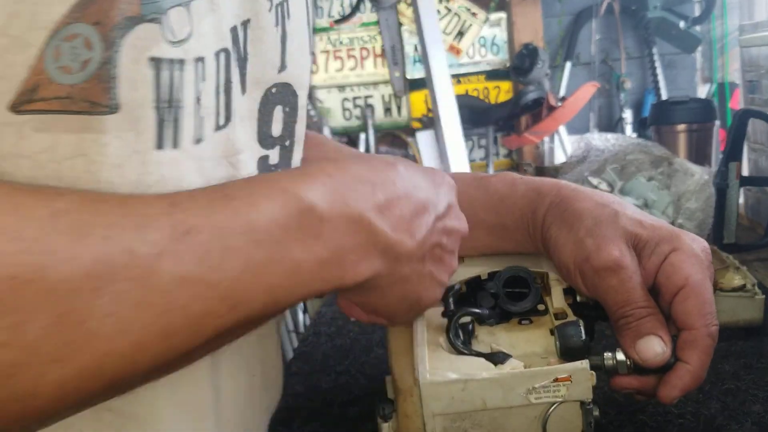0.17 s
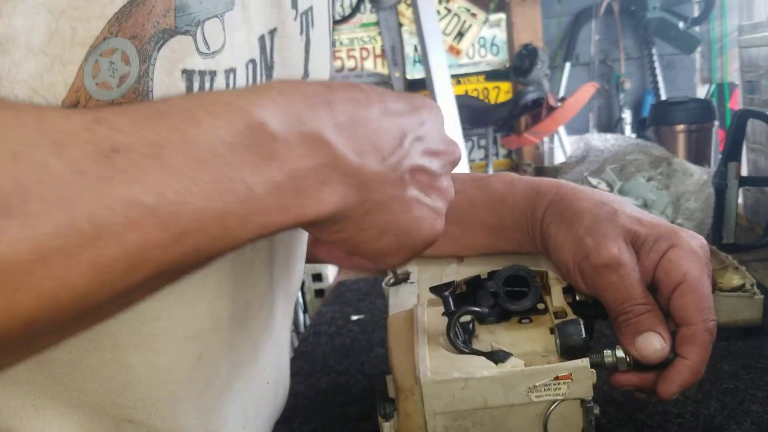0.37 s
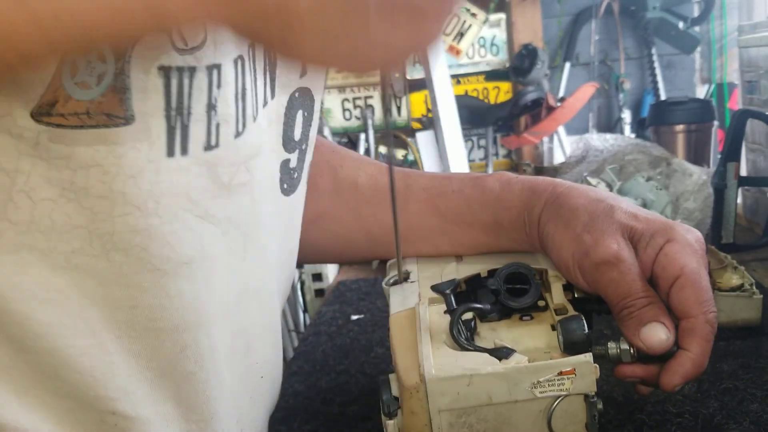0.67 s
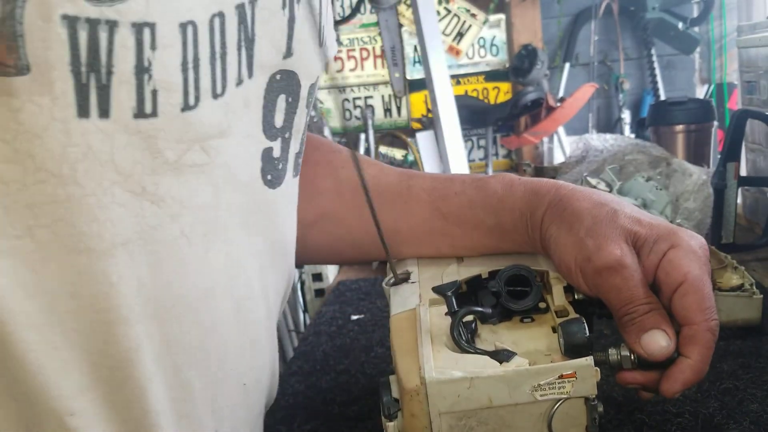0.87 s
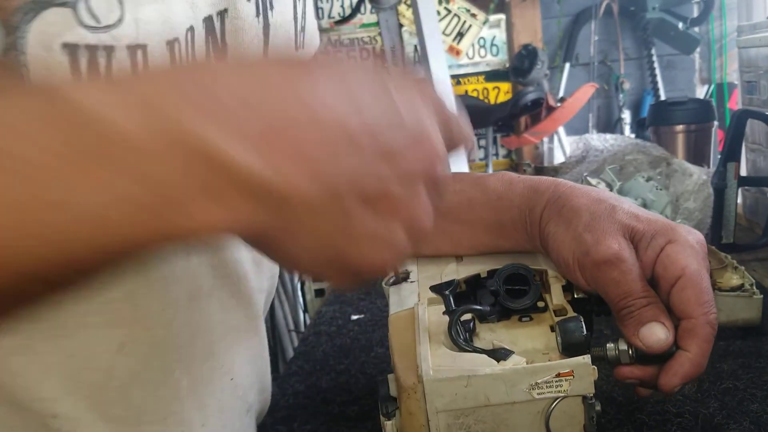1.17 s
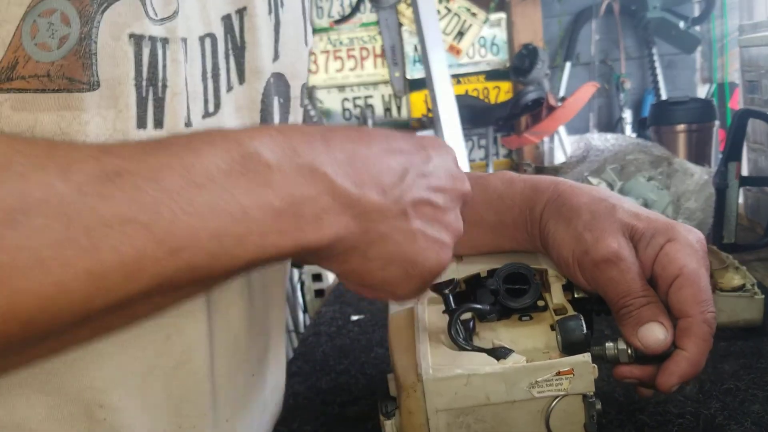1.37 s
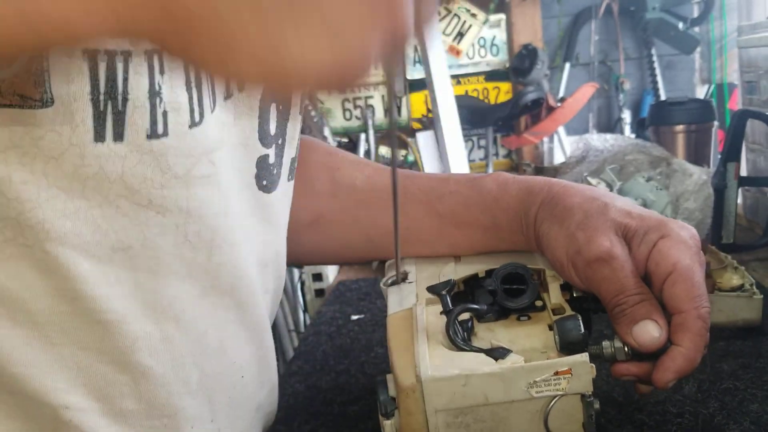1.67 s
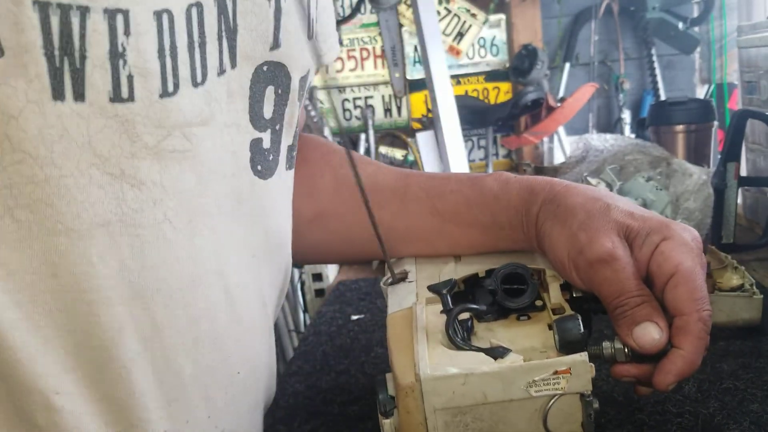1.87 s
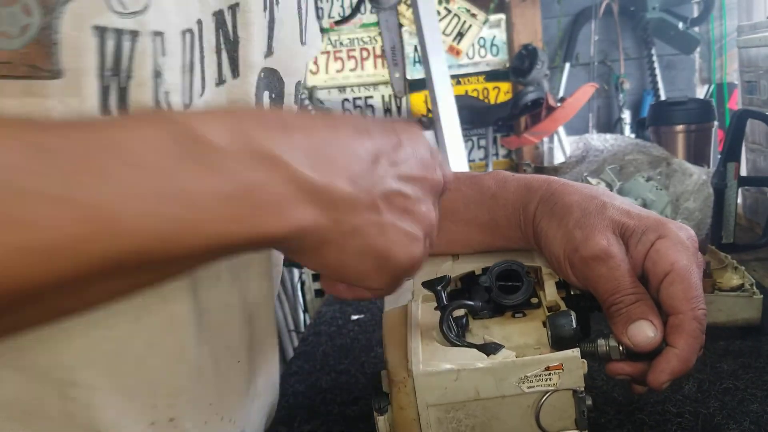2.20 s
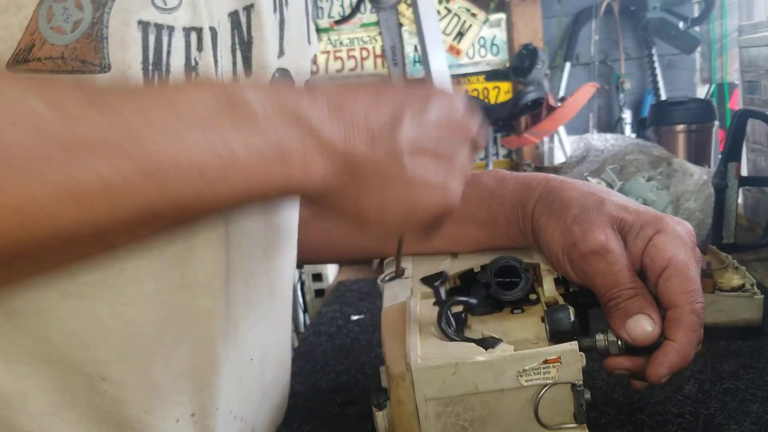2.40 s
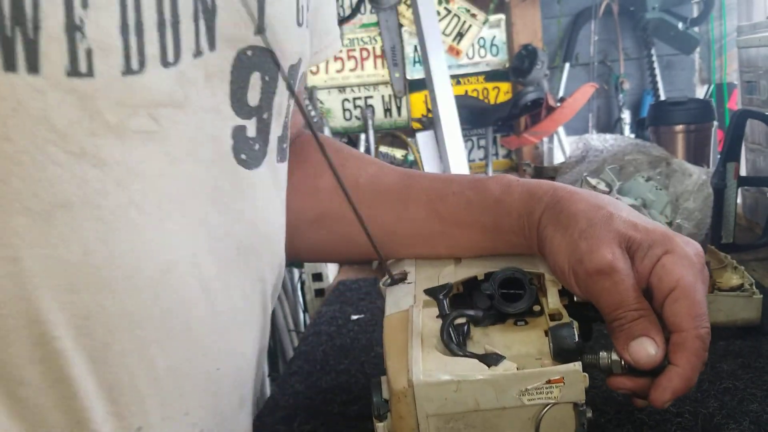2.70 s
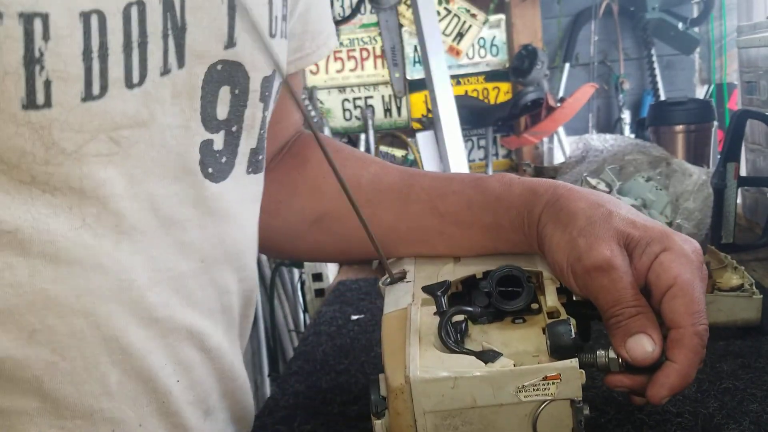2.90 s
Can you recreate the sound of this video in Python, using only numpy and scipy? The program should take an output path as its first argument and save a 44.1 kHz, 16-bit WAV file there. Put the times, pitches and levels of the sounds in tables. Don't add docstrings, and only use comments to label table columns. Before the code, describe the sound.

Small chainsaw pull-cord starter yanked three times, engine chuffing over without firing in a workshop

```python
import sys
import numpy as np
from scipy import signal
from scipy.fft import rfft, irfft, next_fast_len
from scipy.io import wavfile
from scipy.ndimage import uniform_filter1d, map_coordinates

SR = 44100
rng = np.random.default_rng(int(sys.argv[2]) if len(sys.argv) > 2 else 0)


def makeup_ratio(level_db):
    decades = np.asarray(level_db, float) / 20
    return 10 ** decades


def wrap_up_sound(samples):
    columns = np.atleast_2d(samples).T
    tamed = np.clip(columns, -1, 1)
    steps = np.round(tamed * 32767).astype(np.int16)
    wavfile.write(sys.argv[1], SR, steps)


N = 134505
T = np.arange(5000) / SR

# (frequency [Hz], density [dB per Hz])
SHOP_LOW = [(15, -50), (30, -26), (75, -4), (130, -9), (220, -4), (330, -7), (450, -13), (780, -11),
            (1250, -22), (1700, -50)]
# (frequency [Hz], density [dB per Hz])
SHOP_HIGH = [(760, -32), (1300, -2), (2220, -3), (2550, -3), (4780, -8), (6830, -9), (8980, -17),
             (11800, -12), (16000, -20)]
# (frequency [Hz], width [Hz], level [dB])
FAN_HUMS = [(80, 7, 6), (320, 30, 1.5)]
# (frequency [Hz], correlation [-1 to 1])
SHOP_ALIKE = [(30, .7), (70, .92), (180, .975), (550, .45), (1650, -.2), (4970, -.04), (15000, -.1)]
# (frequency [Hz], correlation [-1 to 1])
NEAR_ALIKE = [(60, .96), (150, .998), (350, .99), (700, .75), (1500, .45), (5000, .1), (14000, -.45)]
# (frequency [Hz], left over right [dB])
LEAN = [(60, .5), (150, -.5), (300, -1), (700, 3), (1400, 2), (2800, 2), (5980, -1), (15000, -3)]
SHOP_DB, HIGH_DB, WALL_DB = -34, -4, -16

# (time [s], peak [dB], pitch [Hz], crack [dB], upper modes [dB])
KNOCKS = [(.136, -22, 700, -38, 0), (.1425, -14, 620, -37, 3), (.147, -23, 760, -44, -6),
          (.212, -29, 700, -46, -4), (.2555, -15, 690, -38, -1), (1.086, -29, 816, -44, -2),
          (1.4755, -9, 770, -36, -4), (1.481, -24, 520, -44, -2), (2.027, -31, 729, -44, 0),
          (2.246, -16, 681, -30, 2), (2.254, -23, 700, -38, 0), (2.4265, -19, 900, -24, 7),
          (2.4286, -9, 880, -28, -2), (2.432, -24, 830, -32, 12), (2.436, -21, 480, -38, 0)]
# (pitch ratio [1], level [dB], 60 dB decay [s])
CASE_MODES = [(.42, -14, .03), (.7, -8, .022), (1, 0, .02), (1.18, -9, .014), (2.15, -16, .05),
              (2.45, -17, .035), (3.2, -20, .03)]
# (time [s], peak [dB], pitch [Hz], crack [dB], upper modes [dB])
PAWLS = [(.631, -25, 904, -38, -4), (.660, -23, 1040, -33, -5), (.678, -24, 1040, -32, 3),
         (.706, -23, 790, -38, -2), (.727, -21, 960, -36, -6), (.749, -25, 900, -36, 0),
         (.768, -17, 1050, -34, -4), (.815, -29, 1000, -38, 0), (.833, -21, 942, -34, 0),
         (.85, -20, 980, -34, -5), (1.681, -20, 1400, -34, -6), (1.682, -22, 700, -36, 0),
         (1.687, -23, 2000, -36, -6), (1.716, -24, 748, -38, -2), (1.735, -27, 950, -38, 0),
         (1.754, -24, 800, -36, 0), (1.773, -15, 999, -31, 0), (1.779, -20, 1250, -34, 0),
         (1.822, -25, 600, -38, 0), (1.845, -24, 620, -36, 0), (1.864, -12, 940, -32, 2),
         (2.513, -19, 942, -36, 0), (2.539, -17, 686, -36, -2), (2.546, -19, 760, -36, -2),
         (2.584, -17, 960, -33, 0), (2.605, -18, 720, -34, -3), (2.628, -18, 1050, -34, -6),
         (2.646, -14, 900, -35, 0), (2.654, -13, 724, -35, -3), (2.671, -15, 900, -34, 1),
         (2.689, -16, 900, -34, 1), (2.705, -17, 700, -35, 0), (2.733, -8, 1440, -32, -9),
         (2.755, -19, 800, -36, 0), (2.798, -14, 1520, -32, -8)]
# (pitch ratio [1], level [dB], 60 dB decay [s])
PAWL_MODES = [(1, 0, .035), (1.52, -2, .032), (2.1, -12, .03), (2.9, -15, .025)]
UPPER_FROM, BLOW_DB = 1.4, 11

# (frequency [Hz], 60 dB decay [s])
WALL_DECAY = [(150, .08), (400, .14), (1500, .3), (10000, .15)]

# (time [s], level [dB], 60 dB decay [s])
SNAPS = [
    (1.684, -17, .04),
    (.901, -27, .04),
    (.945, -31, .03),
    (2.428, -22, .06),
    (2.738, -23, .04),
    (2.812, -33, .12),
]
# (frequency [Hz], density [dB per Hz])
SNAP_COLOUR = [(1500, -25), (4500, -3), (9000, -6), (12500, 0), (16000, -14)]
# (time [s], level [dB], pitch [Hz], length [s])
SQUEAKS = [
    (.254, -38, 5250, .028),
    (1.760, -26, 12000, .006),
    (1.771, -27, 11800, .012),
    (2.518, -31, 11900, .01),
    (2.81, -34, 12500, .02),
]

# (time [s], level [dB])
EFFORT = [(0, -60), (.55, -48), (.66, -33), (.85, -32), (.97, -48), (1.58, -50), (1.67, -32), (1.86, -32),
          (1.95, -46), (2.42, -46), (2.55, -31), (2.67, -23), (2.8, -31), (2.93, -43), (3.05, -60)]
# (frequency [Hz], density [dB per Hz])
SCRAPE_COLOUR = [(200, -30), (380, -5), (600, -1), (1000, -4), (1450, -7), (2100, -10), (3200, -12),
                 (10700, -16), (16000, -26)]
# (frequency [Hz], density [dB per Hz])
SHAKE_COLOUR = [(40, -22), (70, -6), (120, -2), (190, 0), (320, -25)]
RATTLE_PER_S, SHAKE_DB, SCRAPE_DB = 500, -5, -3.5
CLICK_HZ, CLICK_SPREAD, CLICK_CYCLES, CLICK_DB = 850, .65, 2.5, -6

# (time [s], peak [dB], pitch [Hz], hiss [dB])
SHARP = [(.658, -14, 240, -29), (.751, -10, 234, -32), (.834, -11, 240, -27), (1.663, -13, 238, -32),
         (1.756, -11, 244, -31), (1.847, -11, 238, -28), (2.488, -20, 231, -38), (2.575, -9, 248, -28),
         (2.627, -5, 235, -21), (2.671, -5, 250, -20), (2.72, -7, 245, -22), (2.783, -9, 240, -28)]
# (time [s], peak [dB], pitch [Hz], hiss [dB])
SOFT = [(.627, -24, 215, -38), (.709, -17, 225, -29), (.799, -16, 250, -29), (.884, -26, 223, -33),
        (1.713, -17, 242, -33), (1.806, -18, 250, -32), (1.901, -27, 250, -35), (2.544, -10, 248, -29),
        (2.604, -4, 248, -25), (2.652, -3, 266, -24), (2.697, -5, 272, -24), (2.752, -9, 253, -28),
        (2.828, -16, 262, -30)]
# (ring rise [s], ring decay [s], start phase [turns], hiss lead [s], hiss rise [s],
# hiss decay [s], push [dB])
SHARP_SHAPE = (.002, .005, .55, .002, .003, .005, -12)
SOFT_SHAPE = (.0035, .005, .55, .011, .009, .005, -12)
SHARP_GLIDE, SOFT_GLIDE = -3, 3
# (pitch ratio [1], level [dB], decay [s])
OVERTONES = [(2.1, -22, .004), (3.1, -21, .003)]
# (frequency [Hz], density [dB per Hz])
PORT_COLOUR = [(700, -30), (1500, -10), (2940, -12), (5830, -11), (7100, -8), (8740, -16), (11100, -8),
               (16000, -19)]
# (frequency [Hz], width [Hz], level [dB])
PORT_RING = [(7100, 700, 3), (10900, 900, 2)]
# (time [s], peak [dB], pitch [Hz])
ROCKS = [
    (.679, -27, 240),
    (.768, -27, 220),
    (.85, -24, 240),
    (2.594, -20, 260),
    (2.618, -20, 240),
    (2.643, -16, 250),
    (2.687, -15, 240),
    (2.71, -19, 240),
    (2.77, -24, 240),
]
ROCK_RISE_S, ROCK_FALL_S = .002, .004
PUFF_DB, JET_DB = 2, 1

DUCK_FROM_DB, DUCK_SHARE, DUCK_S = -20, .25, .35
TOP_HZ = 16000


def unit(x):
    return x / np.sqrt(np.mean(x ** 2) + 1e-20)


def along(points, hz):
    f, v = np.transpose(points)
    return np.interp(np.log(hz + 1), np.log(f + 1), v)


def wobble(rate):
    values = rng.standard_normal(N // 40 + 9)
    return map_coordinates(values, [np.arange(N) * rate / SR], mode="wrap")


def filtered(x, response):
    m = next_fast_len(N + SR // 2)
    return irfft(rfft(x, m) * response(np.fft.rfftfreq(m, 1 / SR)), m)[..., :N]


def bumps(peaks, hz):
    return 1 + sum((makeup_ratio(db) - 1) / (1 + (2 * (hz - c) / w) ** 2) for c, w, db in peaks)


def noise(gain, channels=1):
    return unit(filtered(rng.standard_normal((channels, N)), gain))


def swell(rise, fall):
    e = (1 - np.exp(-T / abs(rise))) ** 2 * np.exp(-T / abs(fall))
    return e / e.max()


def add(track, s, sound):
    part = track[round(s * SR):][:len(sound)]
    part += sound[:len(part)]


def spread(pair, alike):
    def shares(hz):
        angle = np.arccos(np.clip(along(alike, hz), -1, 1)) / 2
        return np.array([np.cos(angle), np.sin(angle)])

    def lean(hz):
        return makeup_ratio(along(LEAN, hz) * np.array([[.5], [-.5]]))

    mid, side = filtered(pair, shares)
    return filtered(np.array([mid + side, mid - side]), lean)


def shop():
    low = noise(lambda hz: makeup_ratio(along(SHOP_LOW, hz)) * bumps(FAN_HUMS, hz), channels=2)
    low = low * makeup_ratio(1.5 * wobble(14) + .8 * wobble(2.5))
    high = noise(lambda hz: makeup_ratio(along(SHOP_HIGH, hz)), channels=2)
    high = high * makeup_ratio(HIGH_DB + .7 * wobble(20) + .5 * wobble(2.5))
    return makeup_ratio(SHOP_DB) * spread(low + high, SHOP_ALIKE)


def knocks(rows, modes, rough, body_db, ring_db):
    out = np.zeros(N)
    for s, db, hz, crack_db, upper_db in rows:
        rough_noise, body_noise, crack_noise, *mode_noise = rng.standard_normal((10, len(T)))
        ring = 0
        for (ratio, mode_db, t60), w in zip(modes, mode_noise):
            level = mode_db + upper_db * (ratio > UPPER_FROM) + .8 * w[0]
            ring = ring + makeup_ratio(level - 60 * T / t60) * np.sin(2 * np.pi * ratio * hz * T + .3 * w[1])
        ring = ring * (1 + rough * unit(uniform_filter1d(rough_noise, size=80)))
        band = signal.butter(2, [hz / 2, hz * 4 / 3], "band", fs=SR)
        body = unit(signal.lfilter(*band, body_noise)) * makeup_ratio(body_db - 60 * T / .055)
        crack = makeup_ratio(crack_db + BLOW_DB - 60 * T / .05) * uniform_filter1d(crack_noise, size=5)
        contact = np.minimum(T / .0009, 1)
        add(out, s, (makeup_ratio(db + ring_db) * (ring + body) + crack) * contact)
    return out


def walls(x):
    hz, t, z = signal.stft(rng.standard_normal((2, SR // 2)), SR, nperseg=256)
    tail = signal.istft(z * makeup_ratio(-60 * t / along(WALL_DECAY, hz)[:, None]), SR)[1]
    late = np.pad(x, (250, 0))[None]
    return signal.fftconvolve(late, tail / np.linalg.norm(tail[0]), axes=1)[:, :N]


def metal():
    squeaks, bursts = np.zeros(N), np.zeros(N)
    for s, db, t60 in SNAPS:
        add(bursts, s, makeup_ratio(db - 60 * T / t60) * np.minimum(T / .001, 1))
    for s, db, hz, length in SQUEAKS:
        drift = np.cumsum(rng.standard_normal(len(T))) * .09
        arch = np.sin(np.pi * np.minimum(T / length, 1))
        add(squeaks, s, makeup_ratio(db) * arch * np.sin(2 * np.pi * hz * (1 - .8 * T) * T + drift))
    return squeaks + bursts * noise(lambda hz: makeup_ratio(along(SNAP_COLOUR, hz)))[0]


def clicks(effort, count):
    u, z = rng.random((count, 2)), rng.standard_normal(count)
    start, t = (u[:, 0] * (N - 700)).astype(int), T[:600]
    hz = CLICK_HZ * np.exp(CLICK_SPREAD * z)[:, None]
    size = effort[start] * makeup_ratio(CLICK_DB - 5 * np.log(1 - .97 * u[:, 1]))
    tones = size[:, None] * np.sin(2 * np.pi * hz * t) * np.exp(-t * hz / CLICK_CYCLES)
    places = start[:, None] + np.arange(len(t))
    return np.bincount(places.ravel(), tones.ravel(), N)


def rattle():
    s, db = np.transpose(EFFORT)
    effort = makeup_ratio(np.interp(np.arange(N) / SR, s, db))
    grains = makeup_ratio(3 * wobble(RATTLE_PER_S) + 3 * wobble(70))
    scrape = filtered(grains * rng.standard_normal((2, N)), lambda hz: makeup_ratio(along(SCRAPE_COLOUR, hz)))
    shake = noise(lambda hz: makeup_ratio(along(SHAKE_COLOUR, hz) - hz / 50))[0]
    solid = effort * makeup_ratio(SHAKE_DB) * shake + clicks(effort, count=1500)
    return solid, effort * makeup_ratio(SCRAPE_DB) * unit(scrape)


def patchy(x, depth_db):
    z = signal.stft(x, nperseg=128)[2]
    field = uniform_filter1d(rng.standard_normal(z.shape[1:]), size=5, axis=0)
    field = uniform_filter1d(field, size=8, axis=1)
    return unit(signal.istft(z * makeup_ratio(depth_db * unit(field)))[1][:, :N])


def puffs():
    box, jet = np.zeros(N), np.zeros(N)
    for rows, shape, glide in ((SHARP, SHARP_SHAPE, SHARP_GLIDE), (SOFT, SOFT_SHAPE, SOFT_GLIDE)):
        rise, fall, turn, lead, jet_rise, jet_fall, push_db = shape
        for s, db, hz, hiss_db in rows:
            ring = np.sin(2 * np.pi * (.96 * hz * T * (1 + glide * T) + turn)) * swell(rise, fall)
            for ratio, over_db, decay in OVERTONES:
                tone = np.sin(2 * np.pi * (ratio * hz * T + rng.random()))
                ring = ring + makeup_ratio(over_db + rng.normal(0, 2.5)) * tone * swell(rise, decay)
            push = makeup_ratio(push_db) * np.sin(2 * np.pi * (.48 * hz * T + turn)) * swell(rise, 1.6 * fall)
            add(box, s, makeup_ratio(db + PUFF_DB) * (ring + push))
            add(jet, s - lead, makeup_ratio(hiss_db + JET_DB) * swell(jet_rise, jet_fall))
    for s, db, hz in ROCKS:
        add(box, s, makeup_ratio(db) * np.sin(2 * np.pi * hz * T) * swell(ROCK_RISE_S, ROCK_FALL_S))
    jet = jet * makeup_ratio(2.5 * wobble(400))
    hiss = noise(lambda hz: makeup_ratio(along(PORT_COLOUR, hz)) * bumps(PORT_RING, hz), channels=2)
    return box, jet * patchy(hiss, depth_db=3.5)


def scene():
    box, hiss = puffs()
    shake, scrape = rattle()
    solid = box + shake + metal()
    solid = solid + knocks(KNOCKS, CASE_MODES, rough=.05, body_db=-17, ring_db=3)
    solid = solid + knocks(PAWLS, PAWL_MODES, rough=.15, body_db=-14, ring_db=.6)
    scattered = filtered(solid, lambda hz: np.exp(1j * (hz / 900 + 1.2 * np.sin(hz / 350))))
    near = np.array([solid, scattered]) + hiss + scrape
    return spread(near, NEAR_ALIKE) + makeup_ratio(WALL_DB) * walls(near[0]) + shop()


def low_pass(x):
    return signal.sosfilt(signal.butter(12, 17000, fs=SR, output="sos"), x)


def record(dry):
    power = np.abs(uniform_filter1d(np.mean(dry ** 2, 0), size=4000)) + 1e-9
    over_db = np.maximum(10 * np.log10(power) - DUCK_FROM_DB, 0)
    keep = np.exp(-1 / (abs(DUCK_S) * SR))
    x = dry * makeup_ratio(-DUCK_SHARE * 2 * signal.lfilter([1 - keep], [1, -keep], over_db))
    x = x / (1 + np.abs(x) ** 8) ** (1 / 8)
    return low_pass(filtered(x, lambda hz: (hz < TOP_HZ) * hz / np.hypot(hz, 25)))


dry = scene()
out = record(dry)
wrap_up_sound(out)
```